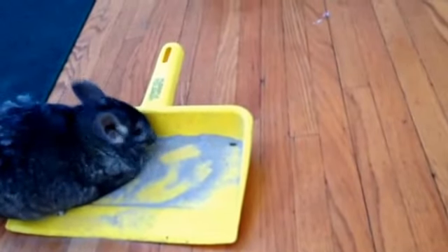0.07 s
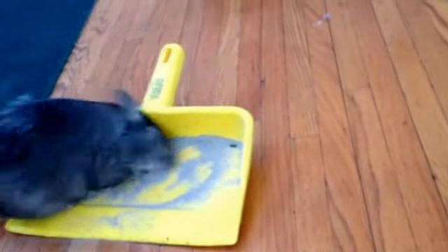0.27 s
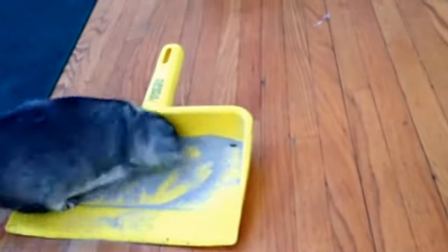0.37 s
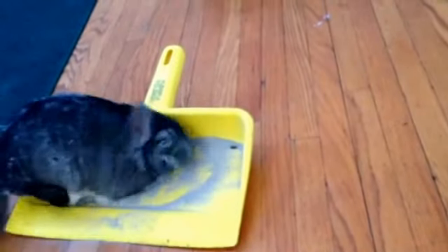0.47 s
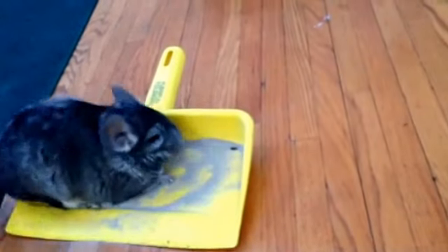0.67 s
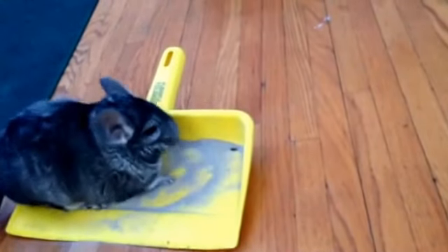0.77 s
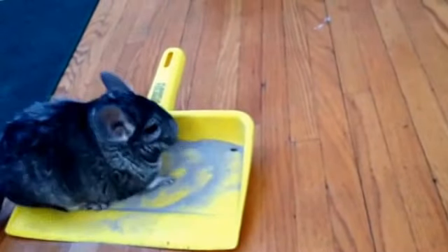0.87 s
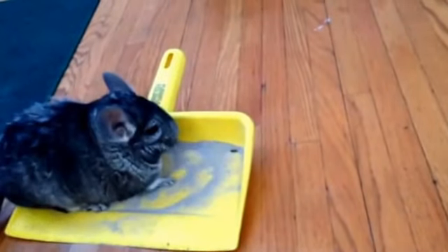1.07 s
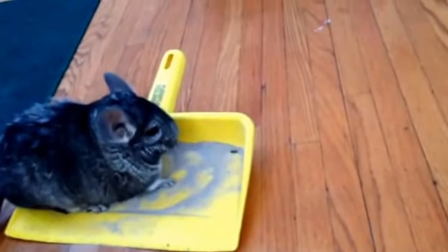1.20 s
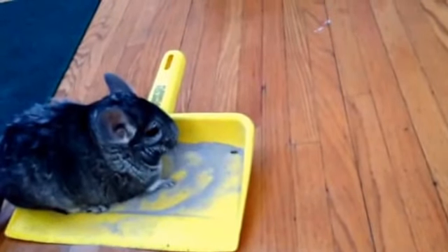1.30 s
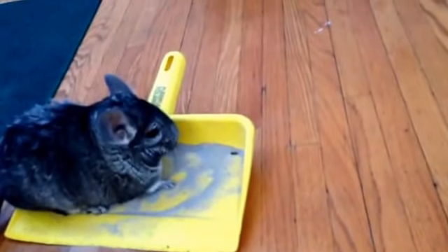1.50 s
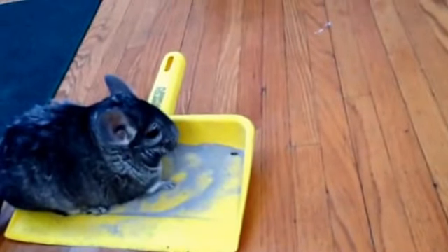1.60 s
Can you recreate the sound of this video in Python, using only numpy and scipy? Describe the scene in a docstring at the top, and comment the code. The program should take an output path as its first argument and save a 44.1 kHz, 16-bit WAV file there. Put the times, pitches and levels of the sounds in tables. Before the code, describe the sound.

Two quick rattling knocks of a plastic dustpan on floorboards, with faint claw ticks and fur rustle

```python
"""A plastic dustpan on a wooden floor is knocked twice, in clusters of blows, by a chinchilla flipping over in dust.
Each blow sums decaying pan modes, a dull knock and a rattle; dispersed clicks are the lip snaps.
Bursts of tiny contacts are claw ticks, short low tones are paw pats, a slow-rising sine is the floorboards.
Shaped noise with sparse grains is the fur in the dust. Behind lie noise-band hum, hiss and a room tail."""
import sys
import numpy as np
from scipy import signal
from scipy.fft import rfft, irfft
from scipy.io import wavfile

SR = 44100
rng = np.random.default_rng(int(sys.argv[2]) if len(sys.argv) > 2 else 0)


def bounce(signal):
    """Save signal as a 16-bit WAV file at the path given by the first command-line argument."""
    frames = np.transpose(np.atleast_2d(signal))
    limited = np.clip(frames, -1, 1)
    pcm = np.round(limited * 32767).astype(np.int16)
    wavfile.write(sys.argv[1], SR, pcm)


N = 72765  # samples


def amp(db):
    """Decibels to gain."""
    return 10 ** (np.asarray(db) / 20)


def unit(x):
    """Scales to rms 1."""
    return x / np.sqrt(np.mean(x ** 2) + 1e-20)


def read(points, hz):
    """Interpolates a table on a log-frequency axis."""
    f, value = np.transpose(points)
    return np.interp(np.log(hz + 1), np.log(f + 1), value)


def curve(points):
    """Gain per sample from a table of t/s, level/dB."""
    return amp(np.interp(np.arange(N) / SR, *np.transpose(points)))


def add(mix, start_s, sound):
    """Mixes a sound in at a time, cut at the end of the mix."""
    part = mix[max(round(start_s * SR), 0):][:len(sound)]
    part += sound[:len(part)]


def tint(x, colour):
    """Filters noise by a spectrum table, then scales to rms 1."""
    gain = amp(read(colour, np.fft.rfftfreq(N, 1 / SR)))
    return unit(irfft(rfft(x) * gain, N))


def click(colour, size=4096):
    """Minimum-phase pulse: the Hilbert transform of the log gain sets its phase."""
    hz = abs(np.fft.fftfreq(size, 1 / SR))
    log_gain = np.log(amp(read(colour, hz)))
    spectrum = np.exp(np.conj(signal.hilbert(log_gain)))
    return np.fft.ifft(spectrum).real[:size // 2]


def fade(t, t60_s):
    """Exponential decay, -60 dB at t60."""
    return np.exp(-np.log(1000) * t / t60_s)


def chatter(t60_s, size=16384):
    """Dying burst of tiny contacts: noise pushed towards a flat spectrum, energy 1."""
    x = rng.standard_normal(size)
    envelope = fade(np.arange(size) / SR, t60_s)
    for _ in range(4):
        # flatten the spectrum, then take the envelope back out
        x = irfft(np.exp(1j * np.angle(rfft(x * envelope))), size)
        level = np.sqrt(np.mean(envelope ** 2))
        x = np.clip(unit(x) * level / (envelope + 1e-9), -3, 3)
    burst = x * envelope
    return burst / np.linalg.norm(burst)


# body blows on the pan: t/s, level/dB, contact softness/ms, floorboard level/dB
BODY_BLOWS = [(0.199, -25.5, 0.06, -88), (0.2231, -6, 0.089, -57.5), (0.2378, -13.5, 0.13, -71),
              (0.2555, -19.5, 0.11, -68), (0.3535, 0, 0.055, -44.5), (0.3581, -18, 0.029, -59),
              (0.386, -14.5, 0.045, -72)]
# pan modes: f/Hz, level re blow/dB, t60/s
PAN_MODES = [(242.6, -32.5, 0.17), (262.6, -43, 0.25), (290.4, -40, 0.41), (356, -35.5, 0.14),
             (449, -38, 0.2), (543, -50, 0.04), (632, -33.5, 0.12), (671.4, -36, 0.093),
             (774, -35.5, 0.081), (814, -34.5, 0.2), (981, -40.5, .15), (1061.6, -33, 0.085),
             (1154, -49, 0.17), (1764, -44, 0.15)]
# dull knock of pan on floor: f/Hz, gain/dB
KNOCK_SPECTRUM = [(30, -61.5), (140, 1.5), (240, 8), (500, 8.5), (1050, 2), (1450, -2), (2500, -7.5),
                  (6000, -24), (15000, -34)]
RATTLE_DB, RATTLE_T60_S, RATTLE_DELAY_S = 2, 0.1225, 0.004  # level and delay re knock


def pan():
    """Each blow knocks the pan, rings its modes and makes it chatter; soft contacts lose treble."""
    t, out, knock = np.arange(SR) / SR, np.zeros(N), click(KNOCK_SPECTRUM)
    ring = np.zeros(SR)
    for k, (hz, db, t60_s) in enumerate(PAN_MODES):
        polarity = (-1) ** k
        ring += polarity * amp(db) * fade(t, t60_s) * np.sin(2 * np.pi * hz * t)
    for start_s, db, soft_ms, _ in BODY_BLOWS:
        body = ring.copy()
        add(body, 0, knock)
        rattle = signal.fftconvolve(chatter(RATTLE_T60_S), knock)
        add(body, RATTLE_DELAY_S, amp(RATTLE_DB) * rattle)
        u = t * 1000 / soft_ms
        push = u * np.exp(-u)  # contact force
        add(out, start_s, amp(db) * signal.fftconvolve(body, push / push.sum())[:SR])
    return out


SPREAD_S = 0.001081  # bending-wave travel time at 1 kHz


def disperse(x, size=4096):
    """Bending waves in plastic: delay goes as 1/sqrt(f), so treble arrives first."""
    f = np.fft.rfftfreq(size, 1 / SR)
    phase = -4 * np.pi * SPREAD_S * np.sqrt(1000 * f)
    return irfft(rfft(x, size) * np.exp(1j * phase), size)


# hard snaps of the pan's lip on the floor: t/s, level/dB
LIP_SNAPS = [(0.2216, -14), (0.3527, 1)]
# sharp contact: f/Hz, gain/dB
SNAP_SPECTRUM = [(150, -13), (1400, -13), (2200, 4), (2900, -4), (4400, -1), (6000, -9), (8000, -15),
                 (15000, -33.5)]
BUZZ_DB, BUZZ_T60_S = -8.5, 0.03  # level re snap


def lip_snaps():
    """A sharp contact disperses through the plastic, then the lip buzzes briefly."""
    out, snap = np.zeros(N), disperse(click(SNAP_SPECTRUM))
    for start_s, db in LIP_SNAPS:
        add(out, start_s, amp(db) * snap)
        buzz = signal.fftconvolve(chatter(BUZZ_T60_S), snap)
        add(out, start_s + SPREAD_S, amp(db + BUZZ_DB) * buzz)
    return out


# claw ticks on the plastic: t/s, level/dB, scratch t60/s
CLAW_TICKS = [(0.1027, -22, 0.014), (0.4744, -25, 0.034), (0.5426, -27.5, 0.012), (0.572, -34.5, 0.007)]
# claw contact: f/Hz, gain/dB
CLAW_SPECTRUM = [(200, -12), (2400, -11), (3600, 2.5), (6000, -2.5), (7500, -8.5), (12000, -9.5),
                 (15000, -13)]


def claw_ticks():
    """A claw scratch is a short burst of tiny contacts with one spectrum."""
    out, claw = np.zeros(N), click(CLAW_SPECTRUM)
    for start_s, db, t60_s in CLAW_TICKS:
        add(out, start_s, amp(db) * signal.fftconvolve(chatter(t60_s), claw))
    return out


# soft paw pats as the animal settles: t/s, level/dB, f/Hz, time to peak/s
PAW_PATS = [(0.5405, -45, 241.6, 0.0088), (0.547, -53, 147, 0.0048), (0.566, -52, 86.2, 0.011)]


def paw_pats():
    """A soft paw raises only one low tone, quickly damped."""
    t, out = np.arange(SR // 4) / SR, np.zeros(N)
    for start_s, db, hz, peak_s in PAW_PATS:
        envelope = (t / peak_s * np.exp(1 - t / peak_s)) ** 2
        add(out, start_s, amp(db) * envelope * np.sin(2 * np.pi * hz * t))
    return out


BOARD_HZ, BOARD_T60_S, BOARD_RISE_S = 76.1, 0.32, 0.028


def floorboards():
    """Each blow excites one low floor mode, which swells and decays."""
    t, out = np.arange(SR) / SR, np.zeros(N)
    rise = 1 - np.exp(-(t / BOARD_RISE_S) ** 2)
    boom = np.sin(2 * np.pi * BOARD_HZ * t) * rise * fade(t, BOARD_T60_S)
    boom /= abs(boom).max()
    for start_s, _, _, board_db in BODY_BLOWS:
        add(out, start_s, amp(board_db) * boom)
    return out


# fur sweeping through dust: t/s, level/dB
SWISH_LEVEL = [(0, -64), (0.095, -63.5), (0.112, -58.5), (0.136, -56), (0.221, -52), (0.245, -58.5),
               (0.333, -62.5), (0.375, -52), (0.439, -59), (0.502, -62), (0.523, -55), (0.569, -60),
               (0.61, -68.5), (0.7, -71.5)]
# swish spectrum: f/Hz, relative density/dB per Hz
SWISH_SPECTRUM = [(60, -35), (250, 1), (800, 1), (1400, -1), (2200, -0.5), (4000, -0.5), (6500, -3),
                  (9000, -5), (15000, -7)]
GRAINS_PER_S, GRAIN_SPREAD_DB, GRAIN_DB = 1500, -15.5, 1.5  # GRAIN_DB re friction noise


def fur():
    """Friction noise plus sparse dust grains of random size and sign."""
    sizes = amp(GRAIN_SPREAD_DB * np.minimum(rng.exponential(1, N), 4))
    hits = rng.random(N) < GRAINS_PER_S / SR
    grains = sizes * rng.choice([-1, 1], N) * hits
    rub = rng.standard_normal(N) + amp(GRAIN_DB) * unit(grains)
    return tint(rub, SWISH_SPECTRUM) * curve(SWISH_LEVEL)


# low room hum: f/Hz, level before swell/dB, width at half amplitude/Hz
HUM_BANDS = [(74.4, -71, 16), (117.6, -71, 18), (236, -88, 26), (341.6, -87.5, 20)]
# slow hum swell: t/s, level/dB
HUM_SWELL_LEVEL = [(0, 1.5), (.72, -2), (.9, 2), (1.2, 1), (1.65, 3.5)]


def hum():
    """Narrow noise bands waver around each hum frequency."""
    f, out = np.fft.rfftfreq(N, 1 / SR), np.zeros(N)
    for hz, db, width_hz in HUM_BANDS:
        resonance = 1 / (1 + (2 * (f - hz) / width_hz) ** 2)
        band = irfft(rfft(rng.standard_normal(N)) * resonance, N)
        out += amp(db) * unit(band)
    return out * curve(HUM_SWELL_LEVEL)


# steady background: f/Hz, relative density/dB per Hz
AIR_SPECTRUM = [(20, -27), (42, -17.5), (55, -35), (80, -2), (125, -7.5), (160, -14.5), (240, -12),
                (350, -18), (520, -23), (1500, -25), (5000, -24), (15000, -26)]
AIR_DB = -64  # rms


def hiss():
    """Steady shaped noise."""
    return amp(AIR_DB) * tint(rng.standard_normal(N), AIR_SPECTRUM)


# room reverberation: f/Hz, t60/s
ROOM_DECAY = [(80, 1), (250, 0.56), (1000, 0.55), (4000, 0.29), (14000, 0.15)]
ROOM_GAP_S, PAN_ROOM_DB, TICK_ROOM_DB = 0.0079, -15, -15


def room(x):
    """Diffuse noise tail; each band decays at its own rate."""
    hz, t, z = signal.stft(rng.standard_normal(SR), SR, nperseg=256)
    decay = fade(t, read(ROOM_DECAY, hz)[:, None])
    tail = signal.istft(z * decay, SR, nperseg=256)[1]
    # silent for one gap, then ramps up over another
    tail = tail * np.clip(np.arange(len(tail)) / SR / ROOM_GAP_S - 1, 0, 1)
    return signal.fftconvolve(x, tail / np.linalg.norm(tail))[:N]


def scene():
    """Sums all sources and the echo, mono on two channels."""
    thumps = pan()
    clicks = lip_snaps() + claw_ticks()
    echo = room(amp(PAN_ROOM_DB) * thumps + amp(TICK_ROOM_DB) * clicks)
    mono = thumps + clicks + echo + paw_pats() + floorboards() + fur() + hum() + hiss()
    return np.array([mono, mono])


LOW_CUT_HZ, EDGE_HZ = 25, 15350


def record(dry):
    """The microphone's bass roll-off and the recorder's band limit."""
    high_pass = signal.butter(3, LOW_CUT_HZ, "high", fs=SR, output="sos")
    low_pass = signal.firwin(511, EDGE_HZ, window=("kaiser", 9), fs=SR)
    return signal.oaconvolve(signal.sosfilt(high_pass, dry), low_pass[None], "same")


dry = scene()
out = record(dry)
bounce(out)
```